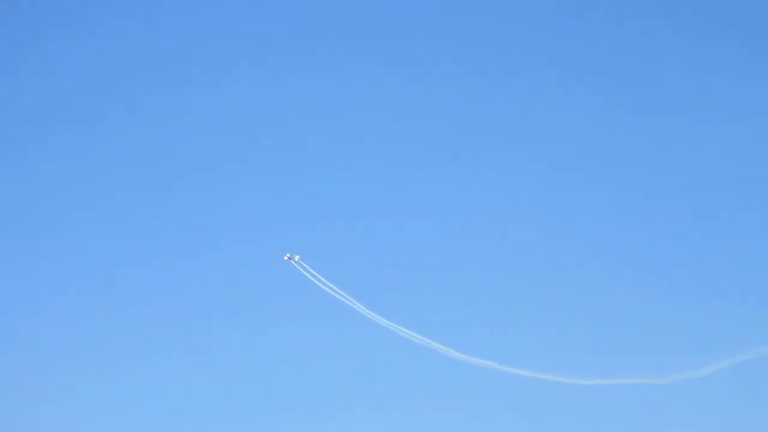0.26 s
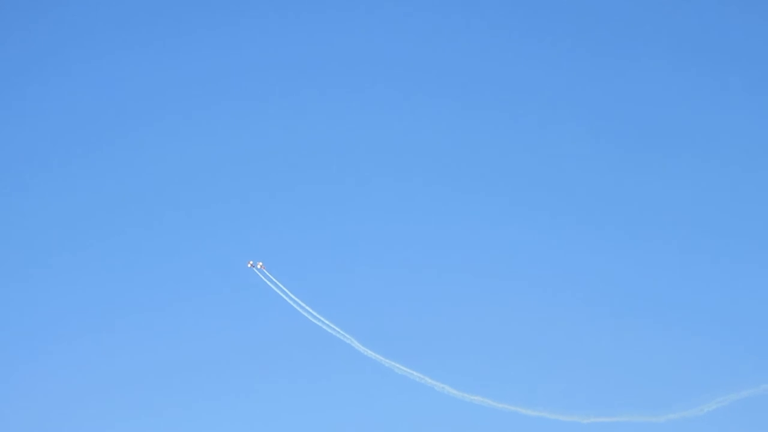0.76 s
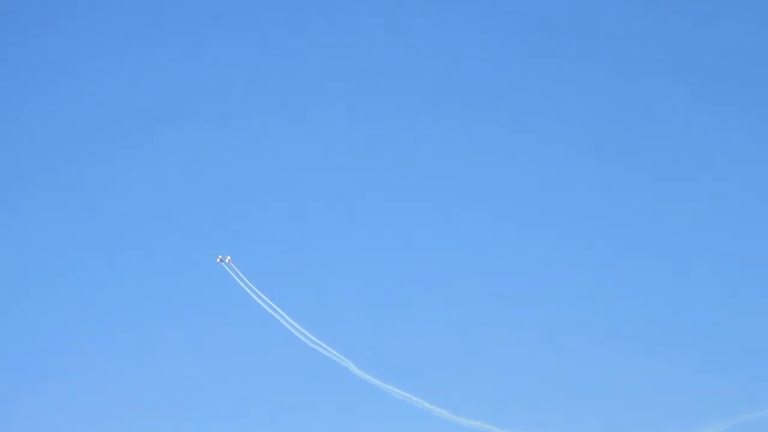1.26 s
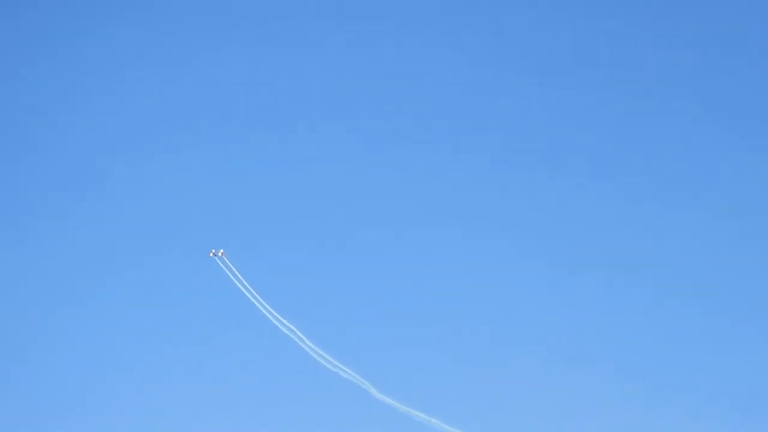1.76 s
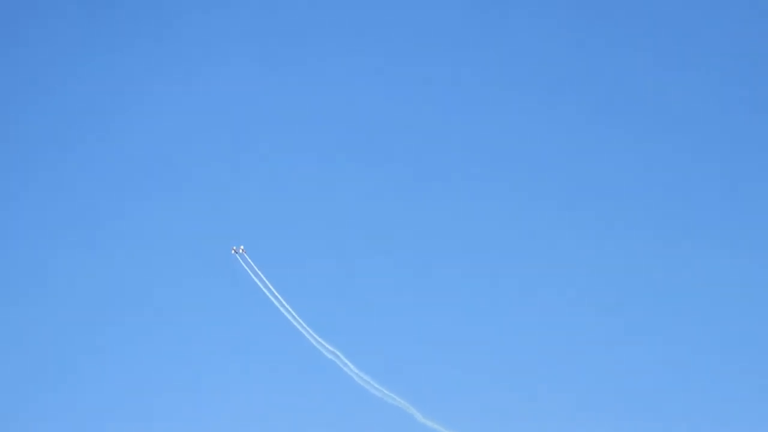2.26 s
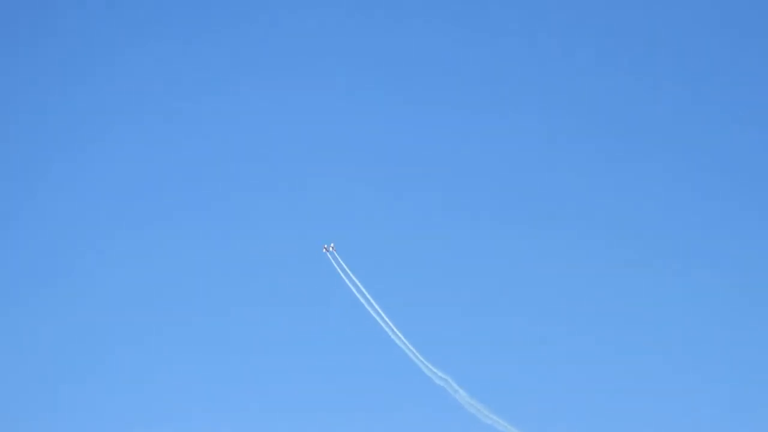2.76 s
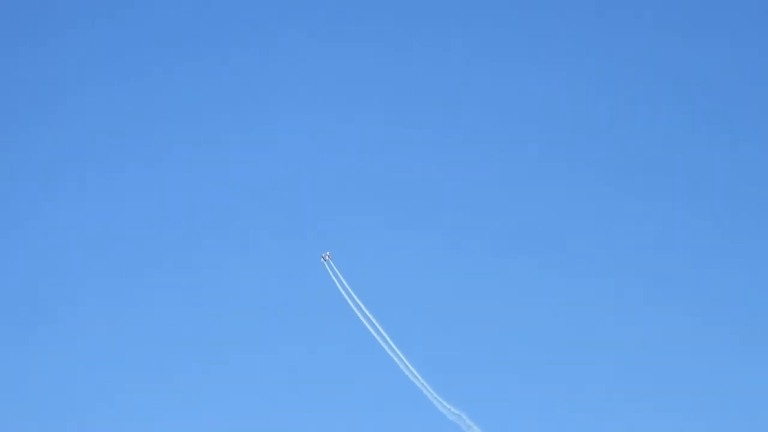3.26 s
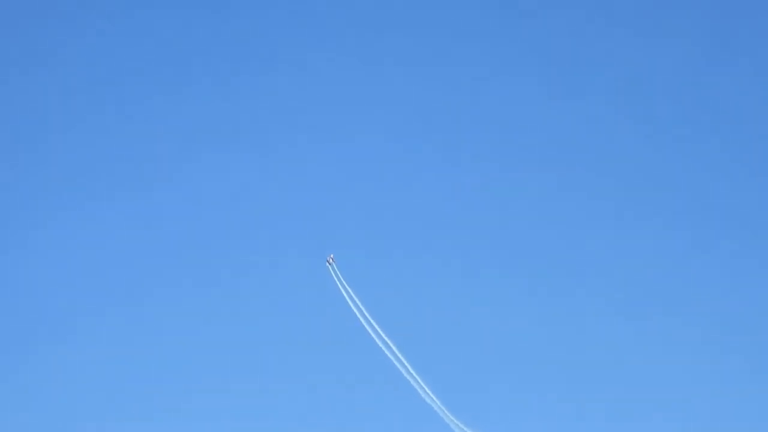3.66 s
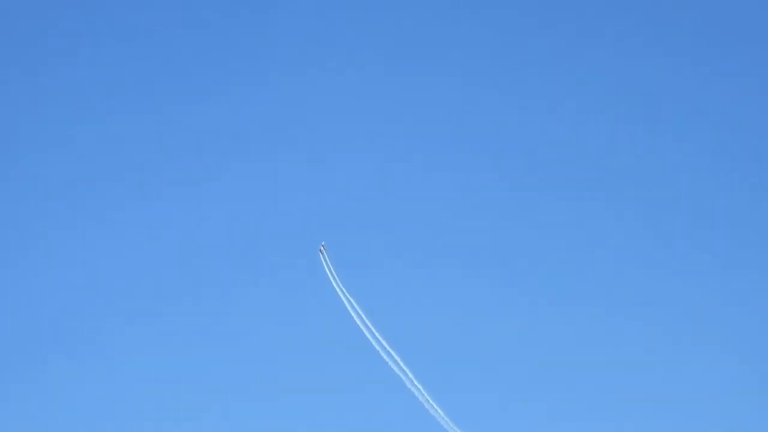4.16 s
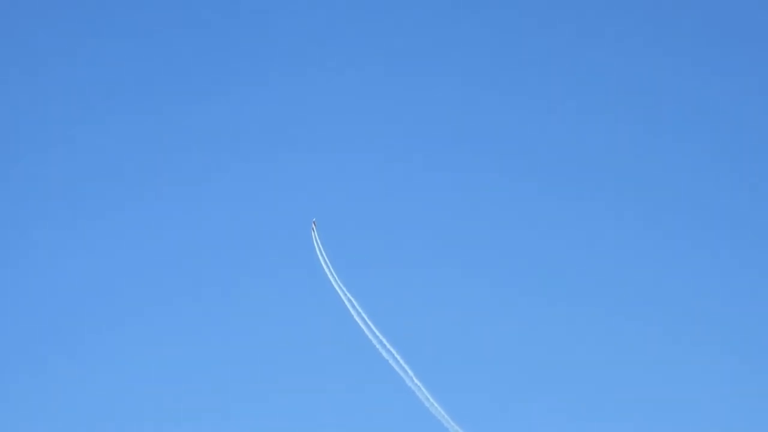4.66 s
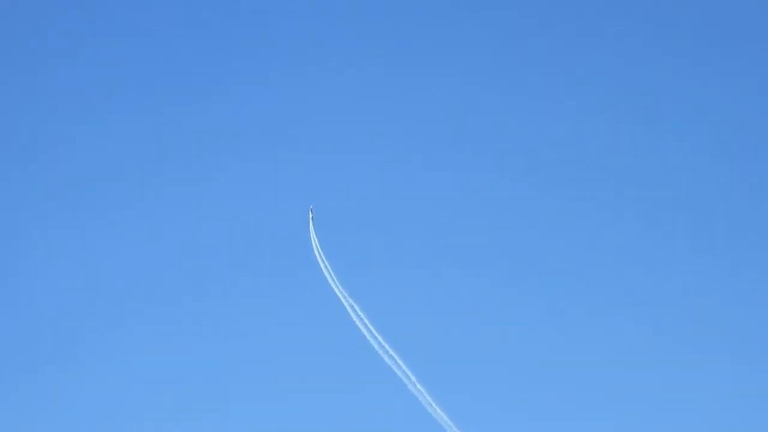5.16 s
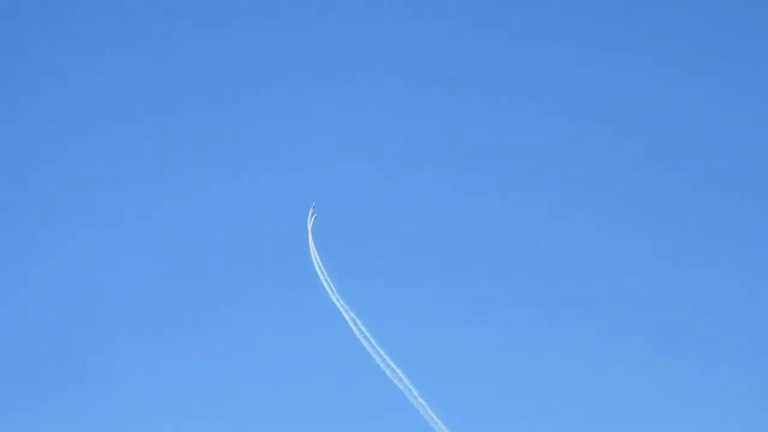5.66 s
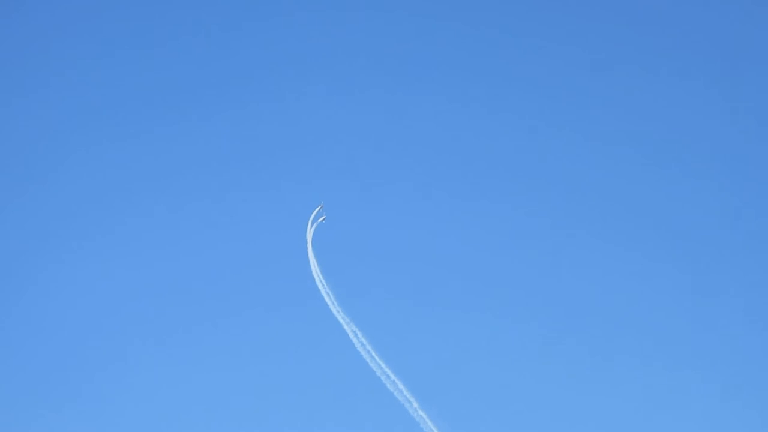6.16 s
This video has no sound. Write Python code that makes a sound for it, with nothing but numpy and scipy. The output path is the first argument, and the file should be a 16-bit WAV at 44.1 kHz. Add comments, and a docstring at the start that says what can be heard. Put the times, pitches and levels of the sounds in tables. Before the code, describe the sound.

Two propeller planes fly in formation high above an open field. Their low drones are slightly out of step, so the hum throbs several times a second; it shifts from deep to more buzzy and climbs gently in pitch, swelling and sinking. A bird chirps near the start, fainter whistles come late. Soft insects, small dry ticks and crackles, and a light gust on an outdoor microphone.

```python
"""Two aerobatic propeller planes pull up into a climb, in formation, far above an open field.
From the start their blade rates run a few hertz apart, so the drone throbs, over a far engine and insects.
Early on a bird chirps, others whistle faintly, and small ticks and crackles pop nearby.
As the noses rise the drone shifts in tone and climbs in pitch, swelling and sinking band by band, combed by echo.
Late on more birds whistle, the breeze gusts, a dry clack sounds, and two last crackles follow."""
import sys
import numpy as np
from scipy import signal
from scipy.fft import rfft, irfft
from scipy.io import wavfile

SR = 44100
rng = np.random.default_rng(int(sys.argv[2]) if len(sys.argv) > 2 else 0)


def wrap_up_sound(samples):
    """Save the sound to the file named by the first command line argument, as 16-bit audio."""
    columns = np.atleast_2d(samples).T
    # keep every value between -1 and 1, then stretch to whole-number steps
    tamed = np.clip(columns, -1, 1)
    steps = np.round(tamed * 32767).astype(np.int16)
    wavfile.write(sys.argv[1], SR, steps)


N = 282240
TIME = np.arange(N) / SR
EDGE_HZ = 15050  # top of the audible band

# colour of the open-air wash: frequency_hz, relative_level_db
FIELD_COLOUR = [(20, -42), (55, 5.5), (120, -2.5), (250, -2), (500, -5.5), (900, -4.5), (1450, -10.5),
                (1640, -12.5), (1900, -15), (4000, -25), (6200, -29.5), (9800, -31), (12000, -37.5),
                (15000, -41)]
# breeze: steady level, and one gust that lifts it
BREEZE_DB, GUST_S, GUST_HALF_LENGTH_S, GUST_DB = -57, 5.27, .14, 8.5
# hum lines of the far engine on the ground: multiple_of_its_speed, level_db
FAR_ENGINE_LINES = [(1, -58), (2, -57), (3, -57), (4, -61.5), (5, -53.5), (6, -56), (7, -57.5)]
# insects: fade is the length of each ramp, centred on a bout's start or end
CHORUS_HZ, CHORUS_DB, INSECT_WIDTH_HZ, INSECT_FADE_S = 8000, -75, 420, .1
# nearer insects, before shimmer: start_s, length_s, pitch_hz, level_db
INSECT_BOUTS = [(0, .22, 8000, -73), (.45, .95, 6950, -71.5), (0.904, .5, 8000, -72),
                (1.804, 1.3, 8000, -74), (1.85, 0.65, 7000, -77), (3.2, 3.2, 8000, -73)]
# path of one bird chirp: time_s, pitch_hz, level_db
CHIRP_PATH = [(.49, 2820, -75), (.515, 3100, -58), (.54, 3420, -57), (.556, 3530, -51), (.575, 3500, -59),
              (.61, 3450, -71)]
# far bird whistles, before wobble and flicker: start_s, length_s, first_pitch_hz, last_pitch_hz, level_db
WHISTLES = [(.58, 0.084, 2040, 1980, -57), (.9, 0.14, 2030, 1990, -62.5), (4.637, 0.059, 2460, 3100, -62),
            (4.98, 0.14, 2450, 2290, -61), (5.139, 0.13, 1450, 1270, -53), (5.37, 0.09, 2900, 3600, -65),
            (5.51, .12, 3510, 3570, -65), (5.79, 0.263, 2785, 2730, -62)]
# faint crackles: start_s, relative_level_db
CRACKLES = [(0.467, -42.5), (0.84, -52), (0.8677, -42.5), (1.234, -46), (1.267, -44), (1.9103, -46),
            (2.068, -44), (2.134, -42), (2.1616, -48), (2.202, -43), (2.422, -46.5), (2.47, -44.5),
            (2.496, -45), (2.536, -45.5), (6.239, -44), (6.2767, -45)]
# colour of a crackle: frequency_hz, relative_level_db
CRACKLE_COLOUR = [(1000, -26), (2000, 4), (2700, 9), (3600, -2.5), (4500, -14), (8000, -14), (14000, -39)]
# thin ticks: start_s, gain_db
TICKS = [(.985, -41), (1.7908, -42), (1.7964, -49), (1.8207, -33), (1.826, -50)]
# ringing modes of a tick: pitch_hz, relative_level_db, t60_s
TICK_MODES = [(7470, -2.5, 0.004), (9500, -6, 0.0046), (11900, -2, .002), (14000, -5, .002)]
# a dry clack: start_s, gain_db
CLACKS = [(5.762, -28)]
# ringing modes of the clack: pitch_hz, relative_level_db, t60_s
CLACK_MODES = [(1250, -1, .018), (1520, 2.5, 0.0088), (2480, 3.5, 0.01), (2680, -1, .009), (2900, 0, 0.011),
               (3560, -11, 0.0075)]
# the ground echo, as the spacing of its comb (one over its delay): time_s, spacing_hz
GROUND_COMB = [(0, 327), (.6, 345), (2.3, 377), (3.9, 430), (5.2, 420), (6.4, 482)]
# moments when a band of the drone grows louder or softer, scaled up for the exhaust:
# time_s, half_length_s, lift_db, centre_hz, half_width_octaves
BAND_SWELLS = [(0.297, 0.5, 4.5, 1020, 2.7), (0.268, .4, 11.5, 315, 0.13), (.25, 0.44, 6.5, 155, 0.18),
               (1.3, 0.19, -10, 442, 0.54), (2.6, 0.47, 2.5, 80, .6), (2.6, 0.34, 3, 680, 0.86),
               (3.766, 0.3, 4.5, 164, 0.25), (3.884, 0.21, 6, 437, 0.64), (3.95, 0.25, 8.5, 920, 0.5),
               (4.723, 0.1, 6, 1400, 0.94), (4.974, 0.38, 6, 260, 1.43), (5.307, 0.17, 6, 416, .15),
               (5.6, .35, -6, 530, 0.28), (5.257, .15, 5.5, 800, 0.42), (5.6, 0.38, 7.5, 80.4, 0.99),
               (6.04, 0.21, 7.5, 920, 0.86), (6.4, 0.79, -8.5, 90, 0.61)]
# speed of the leader's engine: time_s, blade_rate_hz
LEADER_RATE = [(0, 75.6), (.4, 75.88), (1, 75.2), (1.6, 75.6), (2, 75.31), (2.8, 76.55), (3.55, 77.4),
               (4.4, 79.55), (5.6, 82.1), (6.4, 83.6)]
# speed of the wingman's engine: time_s, blade_rate_hz
WINGMAN_RATE = [(0, 80.0), (.44, 81.27), (1.03, 76.76), (1.79, 78.53), (2.36, 79.1), (2.65, 81.26),
                (3.17, 81.34), (3.41, 83.31), (3.84, 83.68), (4.31, 82.45), (5.35, 85.32), (5.63, 83.4),
                (5.98, 86.98), (6.4, 89.34)]
# throttle: the wingman gets louder the further it runs above its usual margin over the leader
USUAL_MARGIN_HZ, THROTTLE_DB_PER_HZ = 4.34, 0.96
# As a plane noses up it turns another side to the ground, and each part of its sound moves once to a new level.
# leader's blade harmonics 1, 2, 3, 4, then all higher ones, a row each:
# before_db, after_db, fade_start_s, fade_end_s
LEADER_TONE = [(-37, -48.5, 4.6, 4.85), (-57, -42, 2.4, 3.6), (-46.5, -41, 5.2, 4.46),
               (-55.5, -53.5, 5, 4.9), (-48.5, -51.5, 3, 5.1)]
# the same rows for the wingman, before throttle: before_db, after_db, fade_start_s, fade_end_s
WINGMAN_TONE = [(-31, -41.5, 1, 3.86), (-57.5, -37.5, 1.5, 2.86), (-43, -40.5, 1.2, 2.2),
                (-51.5, -45, 6, 3.48), (-53, -42.5, 3.4, 3.37)]
# colour of the higher blade harmonics: frequency_hz, relative_level_db
OVERTONE_COLOUR = [(380, 9), (430, 3), (500, 5), (585, 1), (670, -7), (760, -7), (1200, -20), (2000, -30),
                   (3000, -40)]
# exhaust growl, roar and rasp, a row each, before each layer's trim and each plane's share:
# before_db, after_db, fade_start_s, fade_end_s
EXHAUST_LEVELS = [(-48, -80.5, 4.94, 5), (-48.5, -54.5, 0.54, 3), (-52.5, -56.5, 3.5, 2.5)]
# colour of the uneven firing lines: frequency_hz, relative_level_db
UNEVEN_FIRING_COLOUR = [(110, -9), (200, 6), (280, -24), (380, -3.5), (460, 1.5), (560, -0.5), (700, -5),
                        (1000, -8)]
# colour of the exhaust growl: frequency_hz, relative_level_db
GROWL_COLOUR = [(60, -29), (200, -10.5), (310, -3), (480, -10.5), (600, -17.5), (1000, -46), (4000, -59)]
# colour of the exhaust roar: frequency_hz, relative_level_db
ROAR_COLOUR = [(100, -54), (400, -12), (560, 5), (720, 4.5), (920, 1.5), (1250, -2), (1600, -22),
               (2500, -45), (8000, -70)]
# colour of the exhaust rasp: frequency_hz, relative_level_db
RASP_COLOUR = [(200, -24), (600, -19), (1100, -3), (1300, 2.5), (1650, 0), (2000, -4.5), (2800, -11),
               (4000, -31), (8000, -52), (15000, -65)]
# frequencies at which growl, roar and rasp follow the swells
GROWL_HZ, ROAR_HZ, RASP_HZ = 347, 766, 1400


def amp(db):
    """Decibels to gain."""
    return np.exp(np.asarray(db) * (np.log(10) / 20))


def unit(x):
    """x at rms 1."""
    return x / np.sqrt(np.mean(abs(x) ** 2) + 1e-20)


def bell(x, centre, half_width):
    """A smooth bump of height 1."""
    return np.exp(-((x - centre) / half_width) ** 2)


def curves(rows):
    """The columns of a time table, one value a sample."""
    s, *columns = np.transpose(rows)
    return [np.interp(TIME, s, column) for column in columns]


def fades(rows):
    """For each row, a level in dB that holds, fades and holds; if its start is after its end, it jumps at the end."""
    return [np.interp(TIME, [start, end], [before, after]) for before, after, start, end in rows]


def gain_at(spectrum, hz):
    """Gain of a colour table at the given frequencies."""
    table_hz, db = np.transpose(spectrum)
    return amp(np.interp(np.log(hz + 1), np.log(table_hz), db))


def colour(x, spectrum):
    """x filtered by a colour table, at rms 1."""
    gains = gain_at(spectrum, np.fft.rfftfreq(len(x), 1 / SR))
    return unit(irfft(rfft(x) * gains, len(x)))


def hiss(hz, width_hz):
    """Noise in one bell-shaped band, at rms 1."""
    band = bell(np.fft.rfftfreq(N, 1 / SR), hz, width_hz)
    return unit(irfft(rfft(rng.standard_normal(N)) * band, N))


def drift(rate_hz, size=2048):
    """Slow complex chance of rms 1, changing about rate_hz times a second."""
    f = np.fft.fftfreq(size, N / SR / size)
    noise = rng.standard_normal(size) + 1j * rng.standard_normal(size)
    slow = np.fft.ifft(noise / (1 + (f / rate_hz) ** 2))
    return np.interp(TIME, np.linspace(0, N / SR, size), unit(slow))


def add(mix, s, sound):
    """Mixes a sound in at s seconds."""
    part = mix[round(s * SR):][:len(sound)]
    part += sound[:len(part)]


def field(air_db=-44.0, sough_db=-61, sough_hz=1650, sough_waver_db=3):
    """Outdoor wash of broad noise, with one narrow airy band that wavers in it."""
    air = amp(air_db + 0.77 * drift(3.9).real) * colour(rng.standard_normal(N), FIELD_COLOUR)
    sough = amp(sough_db + sough_waver_db * drift(5.5).real) * hiss(sough_hz, 110)
    return air + sough


def far_engine(hz=87.64, waver_hz=0.4896):
    """A faint hum of near-steady speed whose harmonic lines fade independently."""
    turns = np.cumsum(hz + waver_hz * drift(0.542).real) / SR
    hum = 0
    for k, db in FAR_ENGINE_LINES:
        fading = unit(1 + 1.84 * drift(1.9))
        hum = hum + amp(db) * (fading * np.exp(2j * np.pi * k * turns)).real
    return np.sqrt(2) * hum


def insects(shimmer_db=3.0):
    """A faint steady chorus of band noise in the grass, with nearer shimmering bouts joining in."""
    out = amp(CHORUS_DB) * hiss(CHORUS_HZ, INSECT_WIDTH_HZ)
    for s, length, hz, db in INSECT_BOUTS:
        to_edge = np.minimum(TIME - s, s + length - TIME)
        gate = np.clip(to_edge / INSECT_FADE_S + .5, 0, 1)
        out = out + gate * amp(db + shimmer_db * drift(25).real) * hiss(hz, INSECT_WIDTH_HZ)
    return out


def birds(flicker_db=4, echo_db=-8, echo_t60=0.97):
    """Gliding sines: one chirp, thin whistles farther off, and an outdoor echo of decaying noise."""
    hz, db = curves(CHIRP_PATH)
    sounding = (TIME > CHIRP_PATH[0][0]) * (TIME < CHIRP_PATH[-1][0])
    calls = np.sqrt(2) * amp(db) * np.sin(2 * np.pi * np.cumsum(hz) / SR) * sounding
    for s, length, first_hz, last_hz, db in WHISTLES:
        n = round(length * SR)
        glide = np.linspace(first_hz, last_hz, n) * (1 + 0.0091 * drift(37).real[:n])
        level = amp(db + flicker_db * drift(20).real[:n]) * signal.windows.tukey(n, .6)
        add(calls, s, np.sqrt(2) * level * np.sin(2 * np.pi * np.cumsum(glide) / SR))
    tail = rng.standard_normal(SR) * np.exp(-np.log(1000) * TIME[:SR] / echo_t60)
    echo = signal.fftconvolve(calls, tail / np.linalg.norm(tail))[:N]
    return calls + amp(echo_db) * echo


def breeze():
    """A soft lumpy rumble of low noise as air brushes the microphone."""
    gust = GUST_DB * bell(TIME, GUST_S, GUST_HALF_LENGTH_S)
    return amp(BREEZE_DB + gust + 2 * drift(6).real) * hiss(51, 37)


def crackles(level_db=-12, decay_s=0.0011, size=1024):
    """Tiny dry snaps, each a coloured burst of decaying noise."""
    out = np.zeros(N)
    for s, db in CRACKLES:
        burst = rng.standard_normal(size) * np.exp(-TIME[:size] / decay_s)
        add(out, s, amp(db + level_db) * colour(burst, CRACKLE_COLOUR))
    return out


def taps(rows, modes):
    """Each tap rings the same few short decaying modes, of alternating sign."""
    t, out, ring = TIME[:SR // 10], np.zeros(N), 0
    for k, (hz, db, t60) in enumerate(modes):
        decay = np.exp(-np.log(1000) * t / t60)
        ring = ring + (-1) ** k * amp(db) * np.sin(2 * np.pi * hz * t) * decay
    for s, db in rows:
        add(out, s, amp(db) * ring)
    return out


def ground(x, reflection=0.35):
    """The direct sound plus its bounce off the ground, whose delay shifts as the planes move."""
    delayed = TIME - 1 / curves(GROUND_COMB)[0]
    return (x + reflection * np.interp(delayed, TIME, x)) / np.sqrt(1 + reflection ** 2)


def swell(hz):
    """The dB that the swells add at one frequency, over time."""
    t = TIME[::SR // 100]
    lift = 0
    for s, half_length, db, centre, octaves in BAND_SWELLS:
        lift = lift + db * bell(np.log2(hz / centre), 0, octaves) * bell(t, s, half_length)
    return np.interp(TIME, t, lift)


def propeller(tone, passes, skew, imbalance, lag=2.98, waver=0.15, fading_rate_hz=2, count=26):
    """One pressure pulse per blade pass: a rounded wave of low harmonics and a sharp dip of high ones."""
    *low_db, high_db = fades(tone)
    mean_hz = (passes[-1] - passes[0]) * SR / N
    blade = np.exp(2j * np.pi * passes)
    low, high, wave = 0, 0, 1
    for k, db in enumerate(low_db, 1):
        wave = wave * blade
        late = np.exp(-1j * lag * (k == 1))  # radians: the broad push of the fundamental trails the sharp dip
        wavering = unit(1 + waver * (k - 1) * drift(2.3))  # no waver on the fundamental
        low = low + amp(db + swell(k * mean_hz)) * late * wave * wavering
    # harmonics 5 and up, each coloured as if it lay one and a half harmonics lower
    colour_orders = np.arange(len(low_db) - 0.5, count)
    gains = gain_at(OVERTONE_COLOUR, colour_orders * mean_hz)
    for k, gain in zip(colour_orders, gains / np.linalg.norm(gains)):
        wave, height = wave * blade, k / len(low_db)
        flicker = unit(1 + (height - 1) * drift(fading_rate_hz * height))  # deeper and faster higher up
        high = high + gain * amp(swell(k * mean_hz)) * flicker * wave
    alternate = 1 + imbalance * np.cos(np.pi * passes)  # every other pulse is sharper
    pulses = low + amp(high_db) * ground(high * alternate)
    return np.sqrt(2) * (pulses * np.exp(1j * skew)).real  # skew (radians) tilts pulses between push and suction


def exhaust(passes, share_db, firing_db=-3.5, growl_db=-2.5, roar_db=-1, rasp_db=-3,
            puffiness=0.3, flutter_db=2, swell_share=1.68, lope=0.48, count=11):
    """Unequal cylinders throb between the blade harmonics; each firing also lets out a puff of noise."""
    growl_level, roar_level, rasp_level = fades(EXHAUST_LEVELS)
    mean_hz = (passes[-1] - passes[0]) * SR / N
    orders = np.arange(1, count) + .5  # halfway between blade harmonics
    gains = gain_at(UNEVEN_FIRING_COLOUR, orders * mean_hz)
    lines = 0
    for k, gain in zip(orders, gains / np.linalg.norm(gains)):
        line = (unit(1 + 0.72 * drift(0.38)) * np.exp(2j * np.pi * k * passes)).real
        lines = lines - np.sqrt(2) * gain * amp(swell_share * swell(k * mean_hz)) * line
    puffs = np.exp(puffiness * np.cos(2 * np.pi * passes)) * amp(flutter_db * drift(28).real)

    def puffing(band, centre_hz):
        """Puffs of coloured noise, following the swells at one frequency."""
        return amp(swell_share * swell(centre_hz)) * colour(puffs * rng.standard_normal(N), band)

    growl = puffing(GROWL_COLOUR, GROWL_HZ)
    roar = puffing(ROAR_COLOUR, ROAR_HZ)
    rasp = puffing(RASP_COLOUR, RASP_HZ)
    cycle = 1 - lope * np.sin(np.pi * passes / 2)  # one stronger firing in each engine cycle of four blades
    low = amp(growl_level) * cycle * (amp(firing_db) * lines + amp(growl_db) * growl)
    return amp(share_db) * (low + amp(roar_level + roar_db) * roar + amp(rasp_level + rasp_db) * rasp)


def planes():
    """Two engines slide in and out of step: harmonic k beats k times as fast as the fundamental."""
    leader_hz, wingman_hz = curves(LEADER_RATE)[0], curves(WINGMAN_RATE)[0]
    leader_passes = np.cumsum(leader_hz) / SR
    wingman_passes = np.cumsum(wingman_hz) / SR + 0.1486  # part of a blade ahead at the start
    # the wingman works the throttle to keep station
    throttle = amp(THROTTLE_DB_PER_HZ * (wingman_hz - leader_hz - USUAL_MARGIN_HZ))
    leader = propeller(LEADER_TONE, leader_passes, skew=-2.24, imbalance=0.13)
    leader = leader + ground(exhaust(leader_passes, share_db=-8.5))
    wingman = propeller(WINGMAN_TONE, wingman_passes, skew=-1.96, imbalance=0.097)
    wingman = wingman + ground(exhaust(wingman_passes, share_db=-3.0))
    return leader + throttle * wingman


def scene():
    """The field around, small clicks close by, planes overhead."""
    background = field() + far_engine() + insects() + birds()
    near = breeze() + crackles() + taps(TICKS, TICK_MODES) + taps(CLACKS, CLACK_MODES)
    return (background + near + planes())[None]


def record(dry):
    """The recorder's band limit: a steep low-pass at the edge frequency."""
    low_pass = signal.firwin(511, EDGE_HZ, window=("kaiser", 9), fs=SR)
    return signal.oaconvolve(dry, low_pass[None], "same")


dry = scene()
out = record(dry)
wrap_up_sound(out)
```